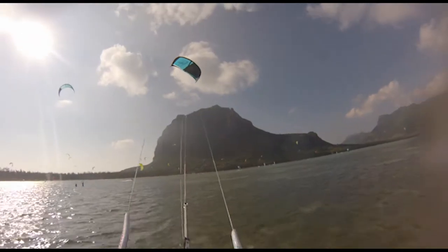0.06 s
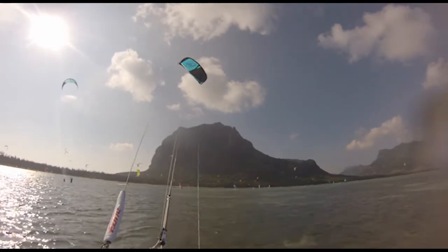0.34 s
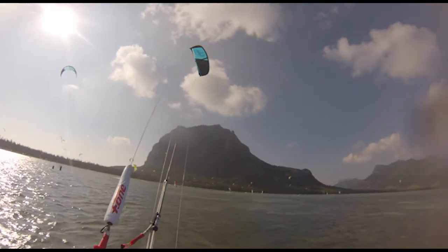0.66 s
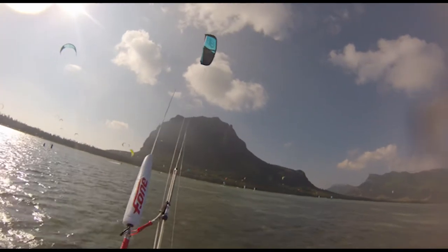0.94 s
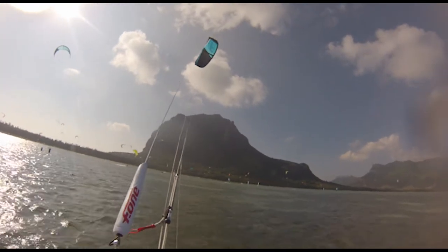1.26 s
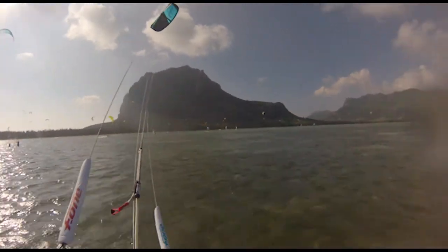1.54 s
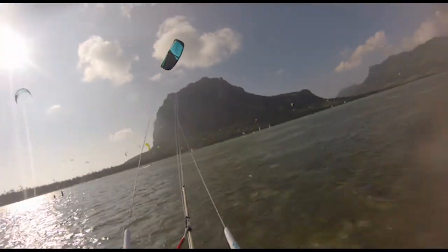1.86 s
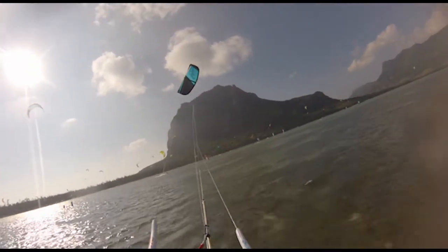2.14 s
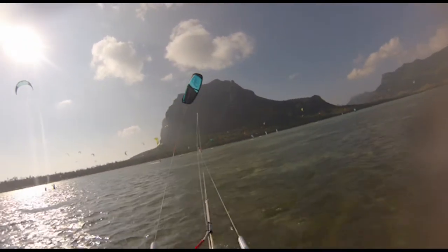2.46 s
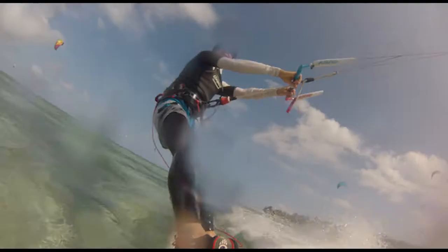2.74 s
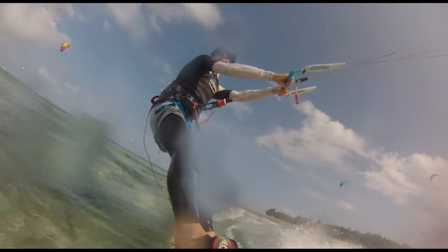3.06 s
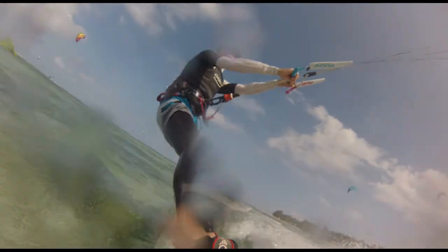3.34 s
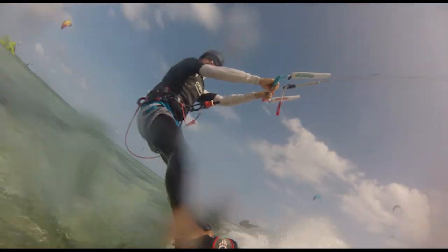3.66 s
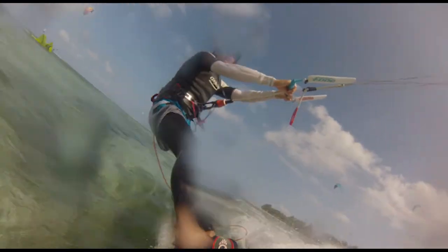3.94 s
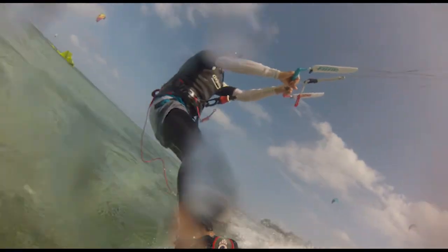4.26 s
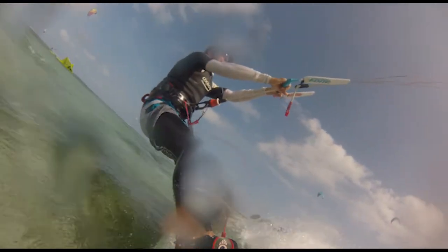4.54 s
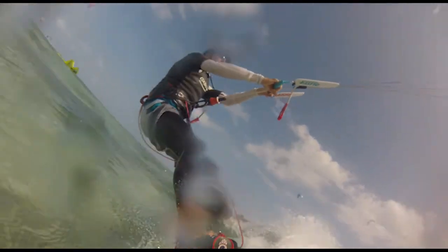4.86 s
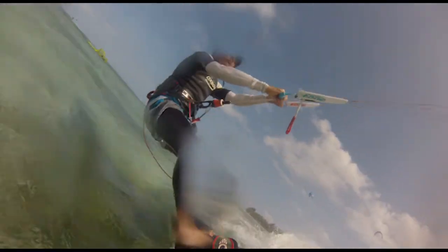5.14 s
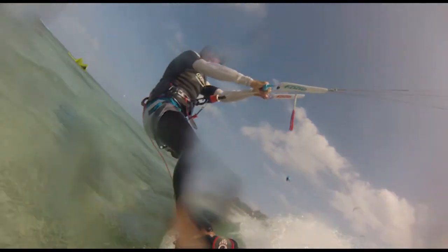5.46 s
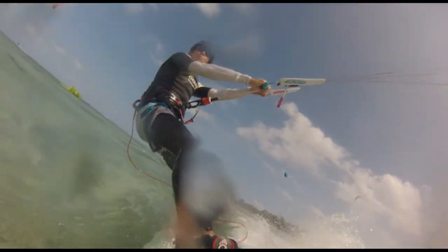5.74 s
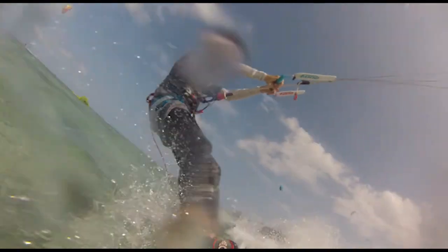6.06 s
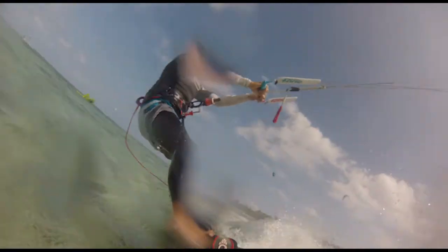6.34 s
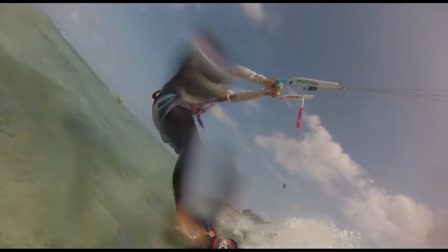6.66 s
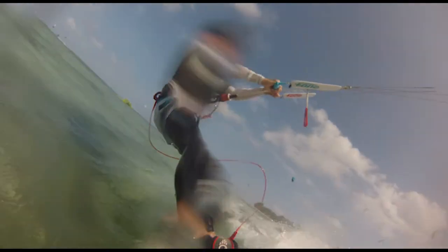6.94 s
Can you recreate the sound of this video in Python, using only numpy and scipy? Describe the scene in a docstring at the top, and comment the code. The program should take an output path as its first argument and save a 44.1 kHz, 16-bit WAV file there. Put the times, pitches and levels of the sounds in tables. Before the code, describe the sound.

From the start, wind buffets a microphone housed on the deck of a kiteboard, making a deep, uneven rumble over the low hum of the flexing board. Water rushes and churns in quick surges, several a second, building with each wave and breaking off behind it. Crests slap the hull with hollow knocks, landings thump, and the mount crackles faintly. Trapped air gurgles underneath, notably around 0.4 seconds. Sharp slaps stand out at about 1.2 and 4.2 seconds, and the hardest comes at 4.7 seconds. Drops splatter and plink on the housing, mostly from 2.6 seconds on, most clearly near 2.9 and 6 seconds. A faint sheet of spray hisses at 6.4 seconds, followed at once by the strongest jolt. Wind and water carry on until about 7 seconds, all very close and without echo.

```python
"""A kiteboard planes over choppy water, heard by a camera in a housing fixed to its deck.
From the start, wind buffets the housing and the board flexes near 52 Hz. Wind and water build up each
wave and break off behind it; crests slap the hull, landings thump the mount, trapped air gurgles.
Drops plink on the housing, mostly from 2.6 s on. The hardest slap comes at 4.7 s, a last sheet of
spray at 6.4 s and the strongest jolt just after it."""
import sys
import numpy as np
from scipy import signal
from scipy.fft import rfft, irfft
from scipy.io import wavfile
from scipy.ndimage import uniform_filter1d

SR = 44100
rng = np.random.default_rng(int(sys.argv[2]) if len(sys.argv) > 2 else 0)


def transcribe(signal):
    """Save signal, clipped to [-1, 1], as a 16-bit WAV file at the path in sys.argv[1]."""
    frames = np.atleast_2d(signal).T
    limited = np.clip(frames, -1, 1)
    pcm = np.round(limited * 32767).astype(np.int16)
    wavfile.write(sys.argv[1], SR, pcm)


N = 308700
TIME = np.arange(N) / SR
FLEX_HZ = 51.67


def undb(db):
    """Decibels to gain."""
    return 10 ** (np.asarray(db) / 20)


def unit(x):
    """Scale to rms 1."""
    return x / np.sqrt(np.mean(x ** 2) + 1e-18)


def walk(rate_hz):
    """Ramps between random levels; rms 1."""
    step = int(SR / rate_hz)
    held = np.repeat(rng.standard_normal(N // step + 1), step)
    return unit(uniform_filter1d(held, step)[:N])


def even(x, span_s):
    """Steady a noise over span_s, leaving its faster flutter."""
    span = int(span_s * SR)
    power = uniform_filter1d(uniform_filter1d(x ** 2, span), span)
    return x / np.sqrt(power + 1e-9)


def patter(per_s, spread_db):
    """Tiny random impacts, a few larger than the rest; rms 1."""
    sizes = undb(spread_db * np.minimum(rng.exponential(size=N), 4))
    hits = rng.random(N) < per_s / SR
    return unit(hits * sizes * rng.choice([-1, 1], N))


def coloured(x, spectrum):
    """Apply a spectrum, falling 24 dB an octave beyond its ends; rms 1."""
    hz = np.maximum(np.arange(N // 2 + 1) * SR / N, 1)
    points_hz, levels_db = np.transpose(spectrum)
    db = np.interp(np.log(hz), np.log(points_hz), levels_db)
    octaves_out = np.maximum(np.log2(hz / points_hz[-1]), 0) + np.maximum(np.log2(points_hz[0] / hz), 0)
    return unit(irfft(rfft(x) * undb(db - 24 * octaves_out), N))


def resonate(x, hz, q):
    """One resonance, gain 1 at its centre."""
    return signal.lfilter(*signal.iirpeak(hz, q, fs=SR), x)


def bursts(source, events, rise_share, tail_s, tail_db):
    """Short swells of a source, each with a faint tail."""
    out = np.zeros(N)
    for time_s, length_s, level_db in events:
        near = slice(max(int((time_s - 4 * length_s) * SR), 0), int((time_s + 4 * length_s + .06) * SR))
        t = TIME[near] - time_s - (rise_share - .5) * length_s
        width_s = 2 * length_s * np.where(t < 0, rise_share, 1 - rise_share)
        swell = np.exp(-np.pi / 2 * (t / width_s) ** 2)
        tail = undb(tail_db) * (t > 0) * (1 - swell) * np.exp(-np.abs(t) / tail_s)
        burst = source[near] * (swell + tail)
        out[near] += undb(level_db) * burst * np.sqrt(length_s * SR / np.sum(burst ** 2))
    return out


# board and housing resonances: centre_hz, width_hz, lift_db
BOARD_MODES = [(204, 47, 10), (228, 10, -0.5), (728, 73, 10), (1018, 153, 6), (1287, 160, 4),
               (2378, 660, 5.5), (3008, 255, 12), (3820, 340, 5), (4670, 420, 3.5), (7070, 470, 3)]

def board(x):
    """Each resonance of board and housing scales its own band and rings briefly."""
    for hz, width_hz, lift_db in BOARD_MODES:
        q = hz / width_hz * undb(lift_db / 2)
        x = x + (undb(lift_db) - 1) * resonate(x, hz, q)
    return x


def through_board(force, spectrum):
    """A coloured force heard through the board; rms 1."""
    return unit(board(coloured(force, spectrum)))


# spectra of rushing water and fine spray: freq_hz, level_db
RUSH_SPECTRUM = [(250, -36), (480, 6), (650, 0), (860, -8), (1150, 0), (1750, -5), (2400, -7.5),
                 (2750, -22.5), (3400, -26), (4500, -40.5), (9000, -69)]
SPRAY_SPECTRUM = [(2000, -23.5), (3500, 1), (4500, -3.5), (5800, -2.5), (7200, -6), (8500, -12.5),
                  (12000, -14.5), (15000, -28)]

def foam():
    """Foam crackles softly over the faint hiss of the wake."""
    crackle = through_board(patter(per_s=900, spread_db=1.5), RUSH_SPECTRUM)
    wake = through_board(patter(per_s=2200, spread_db=4.5), SPRAY_SPECTRUM)
    return undb(-61.5) * crackle + undb(-74.5) * wake


# spray thrown across the housing: time_s, length_s, level_db
SPRAY_SHEETS = [(.67, .06, -75), (1.862, 0.012, -59), (3.64, 0.1, -66), (6.42, 0.068, -59.5)]
# its spectrum: freq_hz, level_db
SHEET_SPECTRUM = [(2500, -25), (3600, -11), (4200, 0), (4700, 4.5), (5300, -11), (6200, -4.5), (7500, -16),
                  (10000, -31)]

def sheets():
    """A sheet of spray builds into a narrow hiss and breaks off."""
    hiss = through_board(rng.standard_normal(N), SHEET_SPECTRUM)
    return bursts(hiss, SPRAY_SHEETS, rise_share=0.8, tail_s=.01, tail_db=-23)


# handfuls of drops on the deck: time_s, length_s, level_db
DECK_SPLATTERS = [(0.543, .015, -53), (0.848, 0.028, -51), (2.483, 0.038, -48.5), (2.743, 0.038, -45),
                  (5.16, 0.035, -47), (5.915, 0.052, -51.5), (6.679, 0.0079, -55)]
# housing rattle: freq_hz, level_db
RATTLE_SPECTRUM = [(1100, -26.5), (1800, -7.5), (2300, 5), (2750, -16), (3300, -17), (4200, -27.5),
                   (7000, -34), (9000, -44.5), (14000, -55)]

def splatters():
    """Drops land in quick bunches and rattle the housing."""
    drumming = through_board(patter(per_s=1100, spread_db=5.5), RATTLE_SPECTRUM)
    return bursts(drumming, DECK_SPLATTERS, rise_share=0.28, tail_s=.012, tail_db=-25.5)


# mount crackle: freq_hz, level_db
TICK_SPECTRUM = [(600, -23.5), (2000, 5), (3500, 4.5), (5500, 4), (6600, 1), (8200, -1.5), (11000, -4.5),
                 (14500, -10), (15500, -17)]

def strain(shake, full_load=0.41):
    """The mount crackles on strong swings, as the fourth power of a saturating load."""
    load = np.tanh(np.abs(shake) / full_load)
    return undb(-44) * load ** 4 * through_board(patter(per_s=22000, spread_db=5), TICK_SPECTRUM)


# larger drops and bubbles: start_s, pitch_hz, level_db
PLINKS = [(.207, 1960, -40), (.604, 1180, -30.5), (2.601, 1900, -43), (2.61, 2060, -35),
          (2.737, 2360, -32.5), (2.779, 1900, -35), (2.805, 1830, -36.5), (2.917, 2260, -20.5),
          (3.034, 1700, -47.5), (3.407, 1850, -44.5), (3.622, 2120, -37), (3.66, 1300, -34.5),
          (4.077, 2320, -37), (4.93, 2320, -34), (5.14, 1790, -41), (5.473, 2000, -37),
          (5.803, 1020, -39.5), (5.891, 1870, -36), (5.916, 1880, -36.5), (6.033, 2230, -21.5),
          (6.642, 1660, -41), (6.674, 1400, -46.5), (6.815, 1100, -36)]

def drops(decay_cycles=4, glide=0.03, attack_s=0.0012):
    """Each drop splats on the housing and rings a few cycles, rising slightly in pitch."""
    rings, t = np.zeros(N), np.arange(SR // 20) / SR
    for start_s, pitch_hz, level_db in PLINKS:
        decay = np.exp(-t * pitch_hz / decay_cycles)
        turns = np.cumsum(pitch_hz * (1 + glide * (1 - decay))) / SR
        ring = decay * (1 - np.exp(-t / attack_s)) * np.sin(2 * np.pi * turns)
        start = int(start_s * SR)
        rings[start:start + len(t)] += undb(level_db + 3) * ring / np.abs(ring).max()
    water = through_board(rng.standard_normal(N), RUSH_SPECTRUM)
    splats = [(start_s + attack_s, .004, level_db - 6) for start_s, _, level_db in PLINKS]
    return rings + bursts(water, splats, rise_share=.15, tail_s=0.0056, tail_db=-12.5)


# air under the hull: time_s, pitch_hz, length_s, level_db
AIR_POCKETS = [(0.12, 203.5, 0.044, -24), (0.377, 225.5, 0.0087, -11.5), (0.403, 216, 0.021, -17.5),
               (0.614, 740, 0.0091, -32.5), (1.392, 253.3, 0.097, -30), (1.467, 215, 0.019, -33),
               (3.313, 266, 0.033, -25), (5.565, 213.7, 0.012, -22), (6.455, 215.7, 0.014, -22),
               (6.502, 336, 0.0055, -21)]

def gurgles():
    """Air pockets swept under the board ring at a low, unsteady pitch."""
    out = np.zeros(N)
    wobbled_s = np.cumsum(1 + 0.067 * walk(rate_hz=150)) / SR
    for time_s, pitch_hz, length_s, level_db in AIR_POCKETS:
        near = np.abs(TIME - time_s) < 2 * length_s
        swell = np.exp(-np.pi / 2 * ((TIME[near] - time_s) / length_s) ** 2)
        out[near] += undb(level_db + 1) * swell * np.sin(2 * np.pi * pitch_hz * wobbled_s[near])
    return out


def bubbling(per_size_per_s=42, q=10.3):
    """Bubbles of 14 sizes, each struck at random moments and ringing a few cycles; rms 1."""
    pitches_hz = np.geomspace(500, 2800, 14)
    return unit(sum(resonate(patter(per_size_per_s, spread_db=1.5), hz, q) for hz in pitches_hz))


# waves ridden: leave_s, crest_s, build_s, rush_db, churn_db, spray_db, flex_db, buffet_db
CHOP = [(0.16, 0.033, 0.14, -36.0, -27, -58.5, -18.5, -19), (0.46, 0.097, 0.373, -39, -27, -62, -16, -16.0),
        (0.739, 0.008, 0.105, -33.5, -25.5, -57.5, -18.5, -20),
        (1.048, 0.045, 0.075, -42, -33, -60, -18, -13.5),
        (1.177, 0.013, 0.35, -41.5, -34, -60.5, -14.5, -20), (1.483, 0.11, 0.068, -39, -36, -67, -18, -29),
        (1.626, 0.12, 0.266, -39, -26.5, -59.5, -20.5, -19.5),
        (1.898, 0.044, 0.087, -40, -30, -63.5, -19, -18.5),
        (2.195, 0.061, 0.036, -37, -29.5, -60, -17, -31),
        (2.398, 0.024, 0.37, -39.5, -34, -58.5, -19.5, -15.5),
        (2.597, 0.031, 0.077, -41.5, -29.5, -62.5, -26.5, -23.5),
        (2.736, 0.085, 0.348, -39, -29, -62.5, -21, -17.5),
        (2.976, 0.055, 0.13, -39, -28, -57.0, -19.5, -21), (3.178, 0.021, 0.091, -42, -31.5, -63, -20, -21),
        (3.328, 0.02, 0.066, -33, -19.5, -52.5, -15, -13),
        (3.764, 0.16, 0.044, -40, -34.0, -62.5, -22.5, -21.5),
        (3.9, 0.025, 0.26, -39.5, -35.5, -62.0, -13.5, -20.0),
        (4.157, 0.0046, 0.01, -29.5, -29.5, -51, -11.0, -25.5),
        (4.349, 0.14, 0.52, -43.5, -30, -64, -20.5, -19.0), (4.64, 0.1, 0.23, -40.5, -44, -64.5, -34, -17),
        (4.731, 0.005, 0.33, -39.0, -26.5, -56, -12, -19.5),
        (5.009, 0.066, 0.09, -40, -32.5, -63, -16, -18.5), (5.312, 0.039, 0.21, -37, -31, -58, -19, -19.5),
        (5.407, 0.006, 0.25, -36.5, -31.5, -57, -48, -12.5),
        (5.631, 0.022, 0.15, -43, -27.5, -63, -19.5, -19),
        (5.776, 0.1, 0.39, -37.5, -31.5, -61.0, -19, -16.5),
        (5.952, 0.12, 0.319, -47, -37.5, -69, -20.5, -22.0),
        (6.129, 0.079, 0.05, -37.5, -26.5, -59.5, -13.5, -20.5),
        (6.524, 0.1, 0.23, -38, -29.5, -58.5, -16.5, -16.5), (6.775, 0.014, 0.024, -54, -37, -62, -15, -33),
        (6.913, 0.052, 0.16, -43, -36.5, -66, -16.5, -21.5)]
CHOP_LAYERS = ("rush", "churn", "spray", "flex", "buffet")

def ride_db(layer, fall_s, trough_db, lag_s=0, approach_share=0.41, contact_s=0.014):
    """A layer's level builds up each wave, jumps as the hull meets the crest, holds and dies away."""
    t = TIME[::SR // 1000]
    power = undb(trough_db) ** 2
    for leave_s, crest_s, build_s, *levels_db in CHOP:
        ahead_s = np.maximum(leave_s - crest_s + lag_s - t, 0)
        behind_s = np.maximum(t - leave_s - lag_s, 0)
        approach = approach_share * np.exp(-(ahead_s / build_s) ** 2)
        contact = (1 - approach_share) * np.exp(-ahead_s / contact_s)
        crest_gain = undb(levels_db[CHOP_LAYERS.index(layer)])
        power = power + (crest_gain * (approach + contact) * np.exp(-behind_s / fall_s)) ** 2
    return np.interp(TIME, t, 10 * np.log10(power))


def wash(bubble_share=0.44):
    """Water patters, bubbles and churns along the hull on each wave; spray prickles on the housing."""
    flutter = walk(rate_hz=110)
    rush_db = ride_db("rush", fall_s=0.016, trough_db=-60) - 0.1 + 2.87 * flutter
    churn_db = ride_db("churn", fall_s=0.026, trough_db=-53) - 2.4 + 3.26 * flutter
    spray_db = ride_db("spray", fall_s=0.01, trough_db=-86) - 0.25 + 2.4 * flutter
    impacts = through_board(patter(per_s=5000, spread_db=2), RUSH_SPECTRUM)
    bubbles = through_board(even(bubbling(), span_s=0.011), RUSH_SPECTRUM)
    rush = np.sqrt(1 - bubble_share) * impacts + np.sqrt(bubble_share) * bubbles
    churn = even(through_board(rng.standard_normal(N), CHURN_SPECTRUM), span_s=0.027)
    spray = through_board(patter(per_s=9300, spread_db=6), SPRAY_SPECTRUM)
    return undb(rush_db) * rush + undb(churn_db) * churn + undb(spray_db) * spray


# crests hitting the hull: time_s, length_s, body_db, rattle_db
CREST_SLAPS = [(0.133, 0.0046, -34, -34.5), (0.156, 0.012, -32.5, -46), (.25, 0.0049, -40, -39.5),
               (0.2737, 0.0076, -35, -39), (0.436, 0.012, -25.5, -37.5), (0.607, 0.0047, -29.5, -70),
               (0.726, 0.0025, -19.5, -25.5), (1.013, 0.0045, -25, -48), (1.1666, 0.003, -12, -20),
               (1.392, 0.012, -28, -32), (1.566, 0.0029, -22.5, -56), (1.6028, .0034, -21, -34),
               (1.622, 0.002, -27, -28.5), (1.8945, 0.0063, -26.5, -32.5), (2.184, 0.0014, -27, -26.5),
               (2.666, 0.012, -28, -37.5), (2.9197, 0.0068, -25, -26.5), (2.932, 0.0028, -25, -34),
               (2.9688, 0.0077, -22.5, -33), (3.148, 0.0085, -33, -40.5), (3.2877, 0.0047, -28.5, -32.5),
               (3.3044, 0.014, -24.5, -46), (3.321, 0.0075, -25, -39), (3.7517, 0.0026, -18.5, -27),
               (3.902, 0.0013, -25, -31), (4.1498, 0.0032, -11.5, -27), (4.323, 0.0036, -23, -20.5),
               (4.425, 0.0045, -28.5, -38.5), (4.5037, .005, -29.5, -44), (4.531, .0041, -30.5, -36.5),
               (4.5805, 0.0044, -27.5, -35), (4.628, 0.0069, -30, -29), (4.727, 0.0021, -6, -19.5),
               (4.888, 0.0033, -35, -36.5), (4.9644, 0.0046, -29, -32.5), (5.2988, 0.0025, -24, -26.5),
               (5.402, 0.0044, -26, -37), (5.623, 0.0058, -26.5, -36), (5.72, 0.0075, -37, -38),
               (5.765, .0063, -29, -29.5), (5.8404, .0019, -24.5, -27), (6.0365, 0.0034, -40, -26),
               (6.065, 0.0065, -34, -32.5), (6.124, 0.0049, -37, -32.5), (6.136, 0.0018, -18.5, -30),
               (6.5007, 0.003, -21, -31.5), (6.558, 0.0044, -42.5, -43.5), (6.86, 0.0063, -36, -37.5),
               (6.901, .0037, -32, -37)]
# hull knock: freq_hz, level_db
KNOCK_SPECTRUM = [(200, -10.5), (450, -1), (700, -7), (900, -7), (1150, -2.5), (1550, -6), (1850, -17.5),
                  (3000, -43), (8000, -66.5)]

def slaps(low_cut_hz=800):
    """A crest closes on the hull in milliseconds: a hollow knock and a brighter housing rattle."""
    time_s, length_s, body_db, rattle_db = np.transpose(CREST_SLAPS)
    hull = even(coloured(rng.standard_normal(N), KNOCK_SPECTRUM), span_s=0.0036)
    housing = even(coloured(rng.standard_normal(N), RATTLE_SPECTRUM), span_s=0.0036)
    body = bursts(hull, zip(time_s, length_s, body_db), rise_share=0.1, tail_s=0.013, tail_db=-26.5)
    rattle = bursts(housing, zip(time_s, length_s, rattle_db), rise_share=0.14, tail_s=0.006, tail_db=-19)
    # a small struck patch drives the low resonances only weakly
    body = signal.sosfilt(signal.butter(2, low_cut_hz, "high", fs=SR, output="sos"), body)
    return board(undb(-3) * body + undb(-4) * rattle)


# wind force on the housing: freq_hz, level_db
BUFFET_SPECTRUM = [(9, -24), (18, -6.5), (27, 3.5), (38, -4.5), (55, -6.5), (90, -21), (150, -41.5),
                   (400, -68.5)]

def wind():
    """Eddies push on the housing; the board hums at its wavering bending mode. Each wave stirs both."""
    # the air lags the lift of the board
    buffet_db = ride_db("buffet", fall_s=0.052, trough_db=-32.5, lag_s=0.013) + 1.1
    flex_db = ride_db("flex", fall_s=0.056, trough_db=-36) - 0.23
    eddies = even(through_board(rng.standard_normal(N), BUFFET_SPECTRUM), span_s=0.11)
    bend_hz = FLEX_HZ * (1 + 0.0863 * walk(rate_hz=35))
    bend = np.sqrt(2) * np.sin(2 * np.pi * np.cumsum(bend_hz) / SR)
    return undb(buffet_db) * eddies + undb(flex_db + 2.1 * walk(rate_hz=40)) * bend


# jolts against the chop: time_s, push_db, length_s
LANDINGS = [(0.1656, -2, 0.007), (0.413, -13.5, 0.0046), (.437, -9.5, 0.004), (0.453, -5.5, 0.0032),
            (0.4717, -0.5, 0.011), (0.73, -4, 0.0018), (0.744, -2, 0.0052), (1.026, -5.5, 0.0054),
            (1.178, -6.5, .012), (1.405, -7.5, 0.006), (1.521, -11, 0.0073), (1.6066, -2, 0.0038),
            (1.634, 1.5, 0.0077), (1.8985, 0, 0.0035), (2.197, -8.5, 0.0036), (2.4072, -1, 0.0071),
            (2.5843, -4.5, 0.0092), (2.698, -6, 0.0076), (2.98, -2, 0.0042), (3.1634, -12.5, 0.0051),
            (3.3282, -3, 0.0025), (3.369, -5.5, 0.003), (3.7576, 1, 0.002), (3.8896, -12, 0.0051),
            (4.155, 1, 0.007), (4.329, -8, 0.0058), (4.73, -4.5, 0.0032), (4.9736, -3, 0.0059),
            (5.0138, -1.5, 0.0085), (5.259, -11.5, 0.002), (5.3097, -7, 0.005), (5.772, -1.5, 0.0067),
            (6.0923, -8.5, 0.0037), (6.139, -7.5, 0.0047), (6.461, -9.5, 0.0076), (6.5062, 3, 0.0044),
            (6.766, -4, 0.0062), (6.8773, -9.5, 0.0056)]

def jolts(rebound=0.44, width_hz=28):
    """One pressure pulse per jolt; the board springs back; the mount ticks, more if hard and short."""
    push, ticks = np.zeros(N), []
    for time_s, push_db, length_s in LANDINGS:
        near = slice(int((time_s - .04) * SR), int((time_s + .04) * SR))
        push[near] += undb(push_db) / np.cosh(np.e * (TIME[near] - time_s) / length_s)
        tick_db = -38.5 + 0.73 * push_db - 21.5 * np.log10(length_s / 0.0046)
        ticks.append((time_s, 0.6 * length_s, tick_db))
    omega = 2 * np.pi * FLEX_HZ
    bending_mode = signal.bilinear([omega ** 2], [1, 2 * np.pi * width_hz, omega ** 2], SR)
    spring = signal.lfilter(*bending_mode, push)
    thump = signal.sosfilt(signal.butter(1, 17, "high", fs=SR, output="sos"), push - rebound * spring)
    grit = through_board(rng.standard_normal(N), TICK_SPECTRUM)
    return undb(-1) * thump + bursts(grit, ticks, rise_share=0.9, tail_s=0.0033, tail_db=-23)


# low churn of water: freq_hz, level_db
CHURN_SPECTRUM = [(50, -28.5), (85, 8.5), (130, -4), (200, -3), (320, -5), (480, -13.5), (700, -26.5),
                  (1500, -56.5)]

def scene():
    """Everything reaches one microphone through the housing, with no room around it."""
    shake = wind() + jolts()
    water = wash() + slaps() + gurgles() + foam() + sheets() + splatters() + drops()
    return (shake + strain(shake) + water)[None]


def record(dry, top_hz=15300):
    """The camera rounds peaks near full scale and cuts the top."""
    rounded = dry / (1 + dry ** 8) ** (1 / 8)
    return signal.sosfilt(signal.ellip(8, .2, 70, top_hz, fs=SR, output="sos"), rounded)


dry = scene()
out = record(dry)
transcribe(out)
```